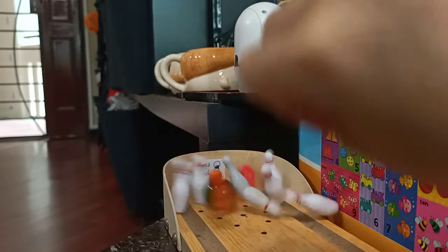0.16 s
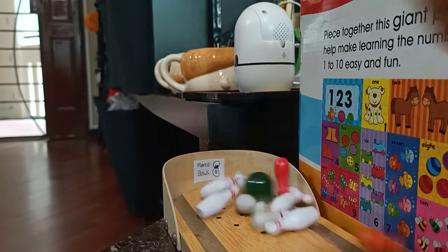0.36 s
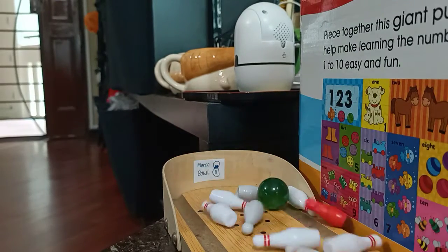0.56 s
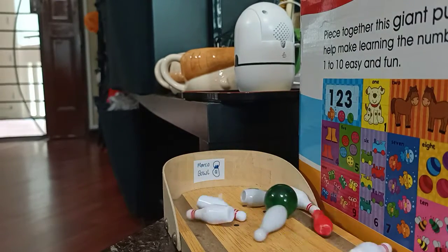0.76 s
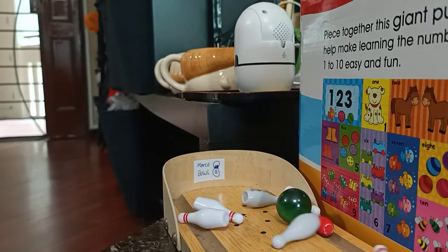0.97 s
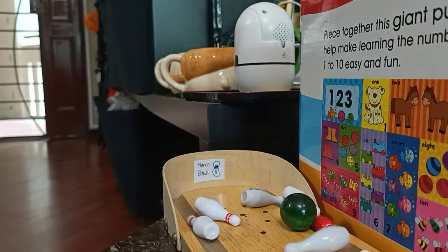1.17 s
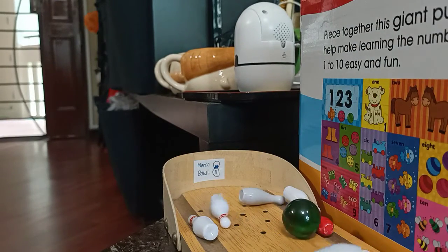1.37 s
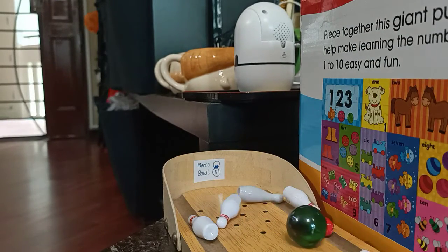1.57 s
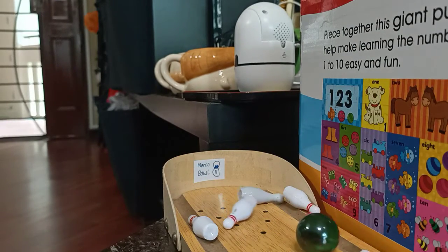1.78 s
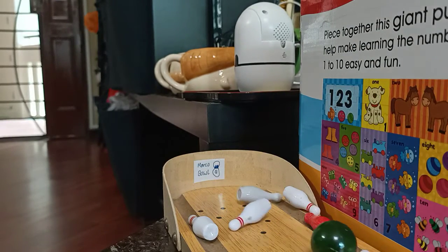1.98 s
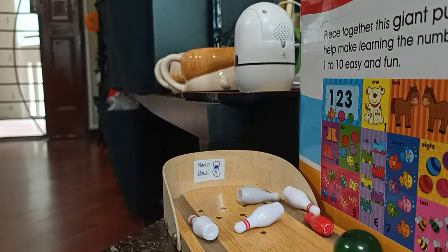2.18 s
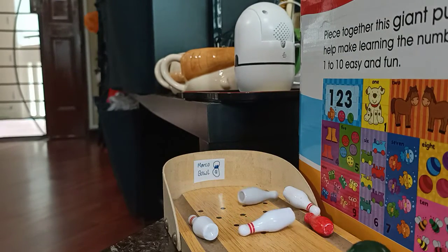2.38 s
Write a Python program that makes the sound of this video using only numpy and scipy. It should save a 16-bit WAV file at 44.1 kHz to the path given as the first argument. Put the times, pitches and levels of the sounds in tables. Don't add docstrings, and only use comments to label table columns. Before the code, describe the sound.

Glass marble smashes into ten tiny plastic pins on a wooden tabletop lane, clattering and settling

```python
import sys
import numpy as np
from scipy import signal
from scipy.fft import rfft, irfft, next_fast_len
from scipy.io import wavfile

SR = 44100
rng = np.random.default_rng(int(sys.argv[2]) if len(sys.argv) > 2 else 0)


def persist_wave(psi):
    counts = np.round(np.clip(psi, -1, 1) * 32767).astype(np.int16)
    wavfile.write(sys.argv[1], SR, np.atleast_2d(counts).T)


def boost_factor(decibels):
    exponent = np.asarray(decibels, float) / 20
    return 10 ** exponent


N = 108045

# f/Hz, level/dB per Hz
AIR = [(38, -20), (62, -1.5), (80, -8), (130, -3), (330, -11), (4000, -35.5), (5300, -47), (7800, -36.5),
       (11500, -48.5), (15000, -45.5)]
# f/Hz, level/dB rms
HUM = [
    (99.5, -61.5),
    (199, -66.5),
    (300, -66.5),
]
# t/s, level/dB
ROLL = [(.19, -99), (.2, -67), (.23, -37), (.36, -40), (.55, -40), (.72, -48), (.88, -51.5), (.95, -60),
        (1.1, -57.5), (1.35, -71.5), (2.45, -80.5)]
# t/s, length/s
BRUSH_TIMES = [
    (.112, .036),
    (.142, .007),
]
# level/dB, tick share/dB, thud share/dB
BRUSH_LEVELS = [
    (-67.5, -13, 15.5),
    (-61, -3.5, -10),
]
# f/Hz, level/dB, t60/s
SLIDE_MODES = [(1874, -3, .009), (3150, -7, 0.012), (4200, -13, 0.0084), (6380, -8, 0.0031),
               (7880, -3, 0.0015)]
# t/s, level/dB, f/Hz
KNOCKS = [(0.1993, -29, 790), (0.248, -26.5, 1000), (0.2805, -25.5, 1300), (0.2844, -23, 676),
          (0.335, -41, 1070), (0.3466, -30.5, 335.3), (0.392, -26, 1520), (0.395, -33.5, 272),
          (0.4175, -27.5, 1440), (0.419, -34, 276), (0.4567, -23.5, 1003), (0.458, -35.5, 487),
          (0.5795, -37, 750), (0.6459, -26.5, 645), (0.9829, -41, 618), (1.011, -41.5, 760),
          (1.0745, -45, 794), (1.1185, -45.5, 580), (1.1628, -43, 1090), (1.166, -47.5, 1020),
          (1.173, -45, 1050), (1.3188, -50, 1400), (1.6426, -51, 1260), (1.6473, -53.5, 1300),
          (1.85, -51, 2906), (2.311, -52, 700), (2.34, -60.5, 1390)]
# ratio to its pitch, level/dB, decay by 60 dB/cycles
KNOCK_MODES = [(.68, -4.5, 6), (1, 3.5, 12), (1.35, -1, 9), (1.8, -8.5, 12.5)]
# t/s, upper ring level/dB, lower ring level/dB
PING_HITS = [(0.2445, -36, -24.5), (0.257, -26.5, -31.5), (0.2972, -25, -24), (0.3223, -51, -9.5),
             (0.3367, -35.5, -19), (0.411, -51, -33.5), (0.438, -40, -27), (0.451, -34, -27),
             (0.4591, -24.5, -25), (0.479, -27, -26), (0.515, -19.5, -39), (0.5807, -49, -25),
             (0.6166, -58, -35), (0.635, -60, -35.5), (0.788, -50, -60), (0.813, -69, -51),
             (0.832, -58, -54), (1.049, -58, -74.5), (1.0763, -48.5, -66), (1.087, -53, -72),
             (1.103, -46, -79), (1.2386, -38, -62), (1.3067, -57, -68), (1.7736, -47.5, -43.5),
             (1.8444, -49, -64), (2.3116, -53.5, -81)]
# f/Hz, t60/s, twin f/Hz, twin level/dB, twin t60/s
PIN_RINGS = [
    (9920, .05, 9960, -16, .15),
    (8600, .036, 8635, -20, .12),
]
# f/Hz, level/dB, t60/s
CLACK = [(1324, -6, 0.011), (1960, 0, 0.0054), (2554, -3, 0.011), (2878, 1, 0.0083), (3610, -0.5, 0.0094),
         (4375, -4.5, 0.0086)]
# f/Hz, level/dB, t60/s
TICK = [(5740, -7.5, 0.0069), (7140, -2, 0.0057), (7856, -4, 0.0075), (8364, -4.5, 0.0081),
        (9650, -11, 0.012), (12000, -18.5, 0.0077), (14600, -17.5, 0.0095)]
# f/Hz, level/dB, t60/s
THUD = [(305.2, -4.5, .035), (540, -2.5, 0.011), (864, -1.5, 0.028), (1176, 0, 0.016)]
# t/s, clack level/dB, tick level/dB
CONTACTS = [(0.1995, -20, -35), (0.2004, -30, -37.5), (0.2126, -33.5, -47), (0.2135, -24, -9.5),
            (0.218, -24, -17.5), (0.2204, -24, -14), (0.2272, -19, -12.5), (0.2295, -25.5, -22),
            (0.238, -31, -21.5), (0.242, -29, -18.5), (0.2462, -22.5, -10.5), (0.2494, -25, -16.5),
            (0.253, -35.5, -25), (0.2571, -33.5, -27.5), (0.2658, -29, -36.5), (0.272, -20.5, -22),
            (0.276, -13.5, -19.5), (0.2808, -8.5, -13.5), (0.2918, -21, -11.5), (0.2989, -14.5, -13.5),
            (0.3026, -15, -10.5), (0.307, -14, -30.5), (0.3092, -21.5, -29.5), (0.3154, -20.5, -24),
            (0.3185, -17.5, -22), (0.3241, -7, -21.5), (0.3264, -16.5, -20), (0.3323, -15, -14.5),
            (0.3354, -14.5, -17.5), (0.3384, -17.5, -16.5), (0.348, -17.5, -14.5), (0.3527, -25, -26.5),
            (0.3623, -30.5, -32), (0.3663, -32.5, -26), (0.369, -32, -36), (0.3731, -54, -31),
            (0.3768, -74, -26), (0.384, -11, -18.5), (0.391, -9, -35), (0.394, -20, -17),
            (0.4183, -17, -25), (0.4224, -21, -27), (0.429, -43, -27), (0.4349, -17, -27), (0.439, -22, -26),
           (0.4429, -19, -29), (0.4461, -24, -24), (0.4567, -14.5, -21), (0.4623, -21, -27),
           (0.4727, -22, -42.5), (0.4806, -21, -35), (0.4844, -20, -23), (0.4924, -16, -20.5),
           (0.5074, -13.5, -33), (0.5109, -23, -42), (0.5184, -17, -19), (0.5208, -17, -16),
           (0.5256, -15, -25), (0.533, -25.5, -48), (0.5465, -18, -26), (0.5498, -17, -34),
           (0.552, -30, -45.5), (0.5546, -20.5, -31), (0.5692, -31, -49), (0.5717, -21, -41),
           (0.575, -20.5, -31), (0.5794, -18.5, -26.5), (0.5893, -32, -39), (0.6007, -37, -37),
           (0.6033, -21, -24), (0.6063, -26, -34), (0.616, -19, -39), (0.622, -25.5, -46),
           (0.6305, -32, -46), (0.6336, -31, -29.5), (0.6423, -29, -43), (0.6442, -23.5, -38),
           (0.647, -36, -38), (0.6491, -40, -47), (0.6507, -26, -52), (0.6558, -19, -39),
           (0.6664, -24, -31.5), (0.6712, -32, -49), (0.6779, -29, -34), (0.6852, -27, -44),
           (0.6887, -42, -49), (0.6994, -23.5, -32.5), (0.7117, -36, -46), (0.7153, -33, -47),
           (0.7267, -36, -54), (0.7313, -34, -52), (0.7371, -24, -20.5),
            (0.764, -62, -40), (0.7862, -27, -43), (0.8039, -26, -22), (0.813, -30.5, -54),
          (0.8451, -36, -41.5), (0.8477, -35, -43), (0.9832, -39, -68), (0.9968, -54, -72),
          (1.0122, -40, -63), (1.016, -43.5, -66), (1.0358, -51.5, -62), (1.0449, -39, -44),
          (1.0488, -38.5, -50), (1.0753, -30.5, -33.5), (1.087, -31.5, -43), (1.097, -35, -42),
          (1.1622, -42.5, -70), (1.1685, -53, -70), (1.1728, -52, -64), (1.1915, -55, -71),
          (1.2386, -42.5, -41.5), (1.3065, -38, -42), (1.3138, -42.5, -68), (1.319, -51, -69),
          (1.3231, -46, -68), (1.6424, -45.5, -64), (1.6459, -42.5, -72), (1.6501, -47.5, -73),
          (1.7116, -50.5, -65), (1.7745, -47.5, -49.5), (1.8412, -49, -68), (1.8525, -49, -68),
          (1.9414, -51, -50), (2.3101, -49.5, -56.5), (2.3137, -49, -66), (2.3392, -56, -80),
            (0.2243, -29, -24.5), (0.2314, -27.5, -18), (0.2767, -14.5, -15), (0.2831, -16.5, -21.5),
         (0.38, -20.5, -26.5), (.4155, -26, -28), (0.829, -31.5, -50), (.8752, -35, -55), (0.884, -47, -56),
         (.8962, -41, -57), (1.101, -37, -49), (1.328, -48, -54), (1.8458, -55, -52)]

DETUNE = 0.05


def rms_one(x):
    return x / np.sqrt(np.mean(x ** 2) + 1e-20)


def drift(rate):
    r = np.exp(-80 * np.pi * rate / SR)
    noise = rng.standard_normal(N // 40 + 2002)
    slow = signal.lfilter([1], [1, -2 * r, r * r], noise)[2000:]
    return np.interp(np.arange(N) / 40, np.arange(len(slow)), rms_one(slow))


def ring(clicks, hz, t60):
    r = boost_factor(-60 / (max(t60, 0.0008) * SR))
    w = 2 * np.pi * hz / SR
    return signal.lfilter([0, np.sin(w)], [1, -2 * r * np.cos(w), r * r], clicks + 1e-18)


def air():
    hz, t = np.fft.rfftfreq(N, 1 / SR), np.arange(N) / SR
    at, db = np.transpose(AIR)
    colour = boost_factor(np.interp(np.log(hz + 1), np.log(at), db))
    hiss = irfft(rfft(rng.standard_normal(N)) * colour, N)
    hum = 0
    for f, level_db in HUM:
        swell = boost_factor(level_db + 1.5 * drift(4.8))
        hum = hum + np.sqrt(2) * swell * np.sin(2 * np.pi * f * t + drift(16))
    return boost_factor(-61) * rms_one(hiss) + hum


def room(x):
    t60_s, wall_cut_hz = 0.32, 4500
    size = next_fast_len(N + SR)
    w = 2 * np.pi * np.fft.rfftfreq(size)
    dull = 1 / (1 + 1j * w * SR / (2 * np.pi * wall_cut_hz))
    echo = 0
    for k, lag in enumerate(rng.uniform(0.004, 0.03, 10) * SR):
        loop = boost_factor(-60 * lag / SR / t60_s) * dull ** 0.56 * np.exp(-1j * w * int(lag))
        echo = echo + (-1) ** k * loop / (1 - loop)
    return irfft(rfft(x, size) * echo, size)[:N]


def rattle(modes, jolts):
    out = 0
    for step in (-1, 0, 1):
        for hz, db, t60 in modes:
            drive = rng.standard_normal(N) * (1 + jolts)
            out = out + boost_factor(db) * ring(drive, hz * np.exp(DETUNE * step), t60)
    return rms_one(out)


def rolling():
    lively_db, jolts_per_s = -53.5, 300
    t = np.arange(N) / SR
    roll_db = np.interp(t, *np.transpose(ROLL))
    lively = boost_factor(np.clip(roll_db - lively_db, -30, 0))
    jolt_size = 12 * boost_factor(1.1 * np.minimum(rng.exponential(1, N), 3))
    jolts = jolt_size * (rng.random(N) < jolts_per_s / SR)

    def surface(modes):
        return lively * rattle(modes, jolts) + (1 - lively) * rattle(modes, 0)

    clack, tick, thud = surface(CLACK), surface(TICK), surface(THUD)
    out = boost_factor(roll_db - 3.5 + 0.83 * drift(40)) * (clack + boost_factor(-7.5) * tick + boost_factor(-3) * thud)
    nudges = boost_factor(roll_db - 25) * lively * rms_one(jolts * rng.standard_normal(N))
    for share, (_, _, hz, _, t60) in zip((0.5, 1), PIN_RINGS):
        out = out + ring(nudges, hz, t60) / np.sqrt(t60 * SR / 28) * share
    for (start, length), (db, tick_db, thud_db) in zip(BRUSH_TIMES, BRUSH_LEVELS):
        swell = np.sin(np.pi * np.clip((t - start) / length, 0, 1))
        out = out + boost_factor(db) * swell * (clack + boost_factor(tick_db) * tick + boost_factor(thud_db) * thud)
    return out


def slide():
    start_s, rise_s, fade_s = 1.894, 0.0045, 0.043
    t = np.maximum(np.arange(N) / SR - start_s, 0)
    noise = rng.standard_normal(N)
    hiss = sum(boost_factor(db) * rms_one(ring(noise, hz, t60)) for hz, db, t60 in SLIDE_MODES)
    return boost_factor(-60) * (1 - np.exp(-t / rise_s)) * np.exp(-(t / fade_s) ** 0.85) * hiss


def knocks():
    out, t = np.zeros(N + SR), np.arange(4000) / SR
    spreads_db = rng.standard_normal((len(KNOCKS), len(KNOCK_MODES)))
    for (s, db, hz), spread_db in zip(KNOCKS, spreads_db):
        i = int(s * SR)
        for (ratio, level_db, cycles), own_db in zip(KNOCK_MODES, spread_db):
            turns = hz * ratio * t
            envelope = boost_factor(-60 * turns / cycles) * (1 - np.exp(-turns / 0.41))
            level = boost_factor(db + 5 + level_db + (ratio != 1) * own_db)
            out[i:i + len(t)] += level * envelope * np.sin(2 * np.pi * turns)
    return out[:N]


def pin_rings():
    out, t = np.zeros(N + SR), np.arange(6000) / SR
    attack = 1 - np.exp(-t / 0.00011)
    for (s, *levels), offs in zip(PING_HITS, rng.standard_normal((len(PING_HITS), 2))):
        i = int(s * SR)
        for db, off, (hz, t60, twin_hz, twin_db, twin_t60) in zip(levels, offs, PIN_RINGS):
            turn = 2 * np.pi * t * np.exp(0.002 * off)
            main = boost_factor(-60 * t / t60) * np.sin(hz * turn)
            twin = boost_factor(twin_db - 60 * t / twin_t60) * np.sin(twin_hz * turn)
            out[i:i + len(t)] += boost_factor(db - 4) * attack * (main + twin)
    return out[:N]


def struck(s, db, modes):
    contact_s, spread_db, soften_cycles = 0.0002, 1.5, 0.45
    draw = rng.standard_normal((len(s), len(modes), 4))
    t, out = np.arange(1600) / SR, np.zeros(N + SR)
    for k, (hz, level_db, t60) in enumerate(modes):
        spread, off, late, side = draw[:, k].T[..., None]
        start = s[:, None] + contact_s * np.minimum(abs(late), 2)
        envelope = boost_factor(-60 * t / t60) * (1 - np.exp(-t * hz / soften_cycles))
        tone = np.sin(2 * np.pi * hz * np.exp(DETUNE * off) * t)
        size = boost_factor(db[:, None] + level_db + spread_db * spread) * np.sign(side)
        places = (start * SR).astype(int) + np.arange(len(t))
        out += np.bincount(places.ravel(), (size * envelope * tone).ravel(), N + SR)
    return out[:N]


def contacts():
    s, clack_db, tick_db = np.transpose(CONTACTS)
    clack = struck(s, clack_db - 9, CLACK * 2)
    tick = struck(s, tick_db - 3.5, TICK * 2)
    thud = struck(s, clack_db - 19.5, THUD)
    return clack + tick + thud


def scene():
    lane = contacts() + knocks() + slide() + pin_rings() + rolling()
    lane = signal.sosfilt(signal.butter(2, 250, "high", fs=SR, output="sos"), lane)
    return (lane + boost_factor(-21) * room(lane) + air())[None]


def band_limit(x):
    return signal.sosfilt(signal.butter(12, 16810, fs=SR, output="sos"), x)


def record(dry):
    mix = signal.sosfilt(signal.cheby2(12, 60, 16900, fs=SR, output="sos"), dry)
    return band_limit(mix)


dry = scene()
out = record(dry)
persist_wave(out)
```